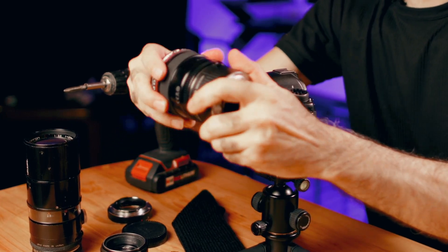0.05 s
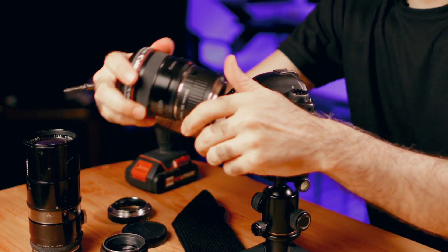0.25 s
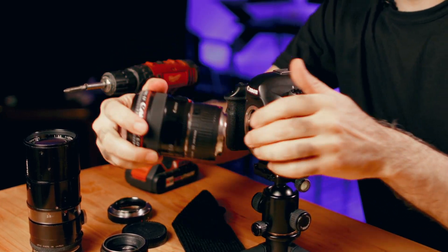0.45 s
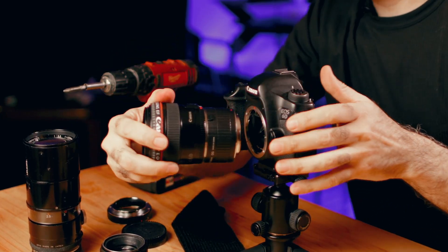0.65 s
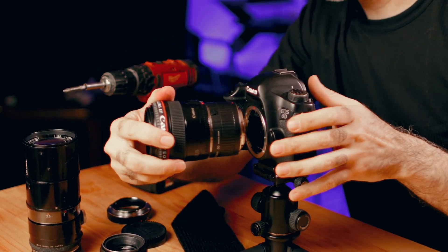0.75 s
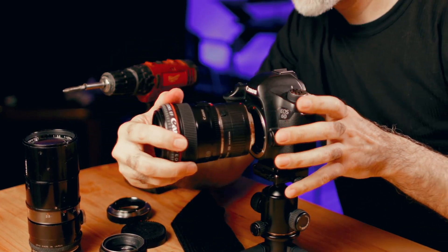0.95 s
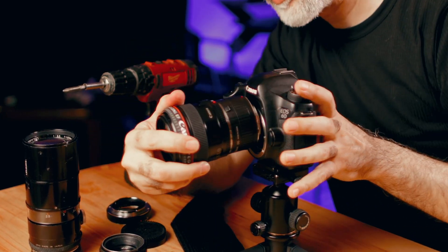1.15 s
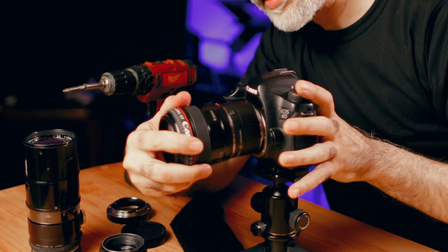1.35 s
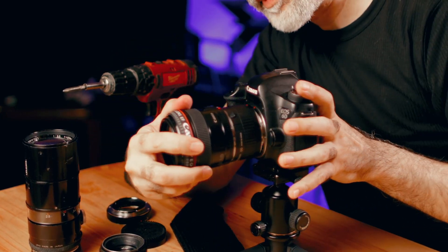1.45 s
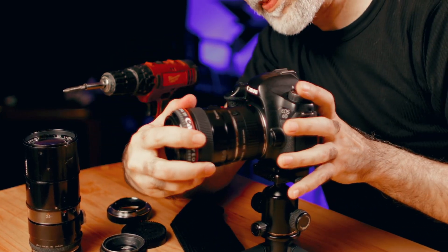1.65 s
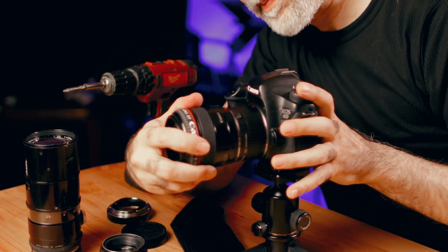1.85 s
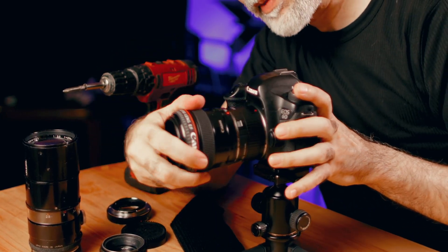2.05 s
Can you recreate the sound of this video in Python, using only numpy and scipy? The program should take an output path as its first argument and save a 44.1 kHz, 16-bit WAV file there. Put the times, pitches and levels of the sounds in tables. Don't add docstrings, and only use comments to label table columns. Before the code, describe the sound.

A camera lens is attached to a camera body, close up in a small quiet room. A very brief slide and sharp metallic snap come at once. Faint finger ticks and soft hollow pops follow from 0.3 to 1.0 s. Metal knocks and scrapes at 1.2 s, light rattles at 1.4, then a dense loud burst of clacks at 1.6-1.7, a small knock at 1.77, and faint ticks around 2.0.

```python
import sys
import numpy as np
from scipy import signal
from scipy.fft import rfft, irfft
from scipy.io import wavfile
from scipy.ndimage import uniform_filter1d

SR = 44100
rng = np.random.default_rng(int(sys.argv[2]) if len(sys.argv) > 2 else 0)


def undo_db(level):
    steps = np.asarray(level, float) / 20
    return 10 ** steps


def transcribe(u):
    v = np.clip(np.atleast_2d(u).T, -1, 1)
    q = np.round(v * 32767).astype(np.int16)
    wavfile.write(sys.argv[1], SR, q)


N = 93006

# [f/Hz, level/dB per Hz]
RUMBLE = [(15, -38.5), (25, -23), (55, 0), (102, -1), (245, -9), (303, -16), (461, -11), (638, -20.5),
          (1200, -29.5), (1560, -58), (2640, -120)]
HISS = [(710, -39.5), (1200, -3.5), (1630, -2.5), (3280, -9.5), (5490, -10.5), (6540, -11), (11100, -2),
        (15500, -11), (16400, -16.5)]
WIDTH = [(15, -33), (25, -8), (101, 1), (501, -10.5), (1630, -26.5), (10000, -13), (15000, -12.5)]
RUMBLE_DB, HISS_DB, WIDTH_DB = -56, -67.5, -73.5

# [f/Hz, level/dB]
ROOM_DECAY = [(150, 0.1), (600, 0.37), (1400, 0.29), (2200, 0.34), (4000, 0.36), (8000, 0.35),
              (14000, 0.35)]
ROOM_COLOUR = [(150, -1), (600, 0), (1400, -1), (2200, -0.5), (3400, -5.5), (8000, -4.5), (14000, 0)]
ROOM_DB, ROOM_GAP_S = -5.5, 0.0013

THUMPS = [
    (1.6048, -31, 305, .035),
    (1.662, -36, 101, .2),
    (1.663, -29, 770, .06),
    (1.665, -37, 163, .25),
    (1.745, -45, 98, .4),
    (1.74, -46, 162, .4),
    (1.965, -51, 200, .08),
]
BARREL_POPS = [
    (.7943, -32, 710, .026),
    (.7945, -35, 800, .03),
    (.7948, -40, 590, .016),
    (.7945, -46, 1350, .012),
    (.9800, -33, 1100, .028),
    (.9805, -44, 540, .014),
    (.9975, -50, 1110, .022),
]
PART_PINGS = [(1.6318, -21, 5835, .011), (1.6318, -28, 830, .045), (1.632, -31, 1696, .03),
              (1.6315, -32, 315, .05), (1.6525, -30, 430, .04), (1.6525, -28, 7800, .007),
              (1.6608, -27, 6500, .009), (1.6615, -31, 10400, .006), (1.662, -29, 1310, .042),
              (1.664, -30, 652, .1), (1.663, -31, 912, .1), (1.655, -29, 320, .05),
              (1.4058, -38, 3000, .018), (1.6055, -27, 4520, .02), (1.6058, -29, 2240, .02),
              (1.6523, -22, 4510, .016), (1.6615, -25, 4000, .008)]
THUMP_DB, POP_ROOM_DB = -0.3, -12

# [t/s, level/dB, centre f/Hz, width/Hz, chatter/s]
FINGER_TICKS = [(0.283, -54.5, 7800, 2520, 0.013), (.3247, -37, 7740, 2200, 0.00094),
                (0.3402, -51, 6480, 2920, .001), (0.6696, -44, 6570, 4930, 0.00088),
                (0.675, -59.5, 2580, 600, 0.009), (.686, -55, 7000, 4070, .002),
                (0.7951, -50.5, 4700, 1200, 0.00058), (0.7949, -42, 1990, 1450, 0.00014),
                (0.9409, -50.5, 1600, 2540, 0.00087), (0.9454, -49.5, 6900, 4990, 0.0014),
                (0.9823, -52, 3370, 3040, 0.0013), (1.9026, -51.5, 3900, 6000, 0.0016),
                (1.963, -57, 8280, 8850, .001), (1.981, -50.5, 3380, 4030, 0.00045),
                (2.0372, -41, 1560, 1470, 0.00043), (2.0994, -37.5, 7660, 4015, 0.0014),
                (2.0985, -46, 12200, 2000, 0.0024), (2.099, -47.5, 3880, 3080, 0.0032)]

# spectrum of its many small modes [f/Hz, level/dB per Hz], its strong modes [f/Hz, level/dB, t60/s]
LATCH = ([(300, -32), (800, -17), (1500, -13), (2400, -6), (3700, -5), (8000, -3.5), (12000, -11),
         (16000, -24.5)], [(894, -9, .02), (2037, 0, 0.018), (3040, 4, .013), (4440, -3, .014),
         (5860, -6.5, .01), (7050, -6, 0.014), (8310, -1, 0.014), (9140, -5, 0.0054)])
LOOSE_MOUNT = ([(120, -41), (200, -2), (2380, -5.5), (2960, -1.5), (4860, -12), (6050, -5.5), (16000, -31)],
               [(353, -1.5, 0.021), (739, -7, 0.034), (988, -6.5, 0.026), (2160, -9, 0.02),
               (2900, 7.5, 0.0042), (6136, -10, 0.0072)])
RESTING_MOUNT = ([(120, -34.5), (200, -7), (696, -2.5), (791, -5), (2960, -2), (16000, -32.5)],
                 [(362, -1.5, 0.03), (436, -4, 0.028), (816, -2, 0.029), (2200, 1, 0.016),
                 (2940, -2.5, 0.019), (5840, -9.5, 0.021), (9800, -6, 0.0067)])
CAUGHT_MOUNT = ([(200, -22), (322, -3.5), (899, -2), (1450, -7.5), (3000, 0.5), (4600, -8.5), (7830, -12),
                (16000, -40.5)], [(320, -9, 0.024), (645, -8, 0.024), (2256, -2.5, .012),
                (2740, -4.5, 0.013), (3310, -6, .015), (4510, -1, 0.013), (6900, -5, 0.0087)])
TIGHT_MOUNT = ([(120, -52), (200, 2.5), (322, 0), (899, -2.5), (1450, -2), (4600, -8.5), (7830, -10.5),
               (16000, -37)], [(420, -13, 0.026), (633, -7.5, 0.0265), (883, -4, 0.019), (2200, 3, 0.0071),
               (4550, -1, 0.01), (5765, -13, 0.0081)])
ROCKED_MOUNT = ([(300, -21), (800, -1.5), (1200, 0), (2400, -8.5), (3300, -9.5), (5100, -9.5), (8000, -19),
                (16000, -39)], [(1174, -2.5, 0.015), (1600, -1, 0.016), (2256, 3.5, 0.012),
                (2550, 0, 0.021), (3310, -7, .015), (5110, -2, 0.01), (6330, -9, .01)])

# [start t/s, length/s, level/dB, tilt/dB per octave]
DRAG_OFF = [
    (-.03, 0.063, -46.5, 0.5),
]
DRAG_LOOSE = [
    (1.205, 0.034, -53.5, -4.5),
    (1.25, 0.071, -50, -1.4),
]
DRAG_RESTING = [
    (1.392, 0.059, -52.5, -0.031),
    (1.435, 0.043, -47.5, -0.37),
    (1.48, 0.047, -62, -0.92),
]
DRAG_CAUGHT = [
    (1.585, 0.034, -48, -2.1),
    (1.607, 0.0266, -36.5, 0.6),
]
DRAG_TIGHT = [
    (1.665, 0.058, -44, -6),
    (1.92, 0.1, -60, -1.5),
]

# [t/s, peak level/dB, tilt/dB per octave, chatter/s]
SNAP = [
    (.0216, -24.5, 17.5, .0003),
    (.0224, -4.5, 1, 0.00017),
]
SEATING = [
    (1.1803, -20.5, 0.79, 0.00056),
    (1.1972, -24.5, 0.74, 0.00024),
    (1.2055, -30, 1.9, 0.0003),
    (1.268, -38.5, -1.1, 0.0023),
    (1.278, -39, 2, 0.00046),
    (1.2872, -28.5, -1.3, 0.00012),
    (1.297, -35, 0.46, 0.00072),
    (1.306, -37, -0.39, 0.00083),
]
SETTLING = [(1.4057, -29.5, 0.45, 0.0018), (1.4085, -37, .5, 0.00086), (1.4118, -34.5, 0.9, 0.001),
            (1.4165, -49, -0.46, 0.0009), (1.4205, -40, .5, .001), (1.4435, -43, 1, .001),
            (1.4547, -39, .5, 0.0014), (1.4635, -38.5, 0.92, 0.001), (1.4665, -42, .5, .001),
            (1.4705, -41, .5, .001), (1.4745, -41, -.6, 0.00085)]
CATCHING = [
    (1.6055, -20, 1.3, 0.00095),
    (1.6135, -24.5, 1.3, 0.00064),
    (1.618, -34, 0.39, 0.00083),
    (1.628, -28.5, 1.8, 0.00087),
    (1.6315, -15.5, 0.59, 0.00091),
    (1.638, -24, -0.85, .001),
]
TWIST = [
    (1.6523, -15, 2.9, 0.00099),
    (1.6548, -16, 1.5, 0.0006),
    (1.6595, -20.5, 1, .0008),
    (1.6615, -15, 1, 0.0011),
    (1.668, -24, 1.4, 0.0015),
    (1.6745, -27.5, -0.5, 0.002),
]
ROCKING = [
    (1.7662, -25.5, -0.13, .001),
    (1.7688, -29, -1, 0.00066),
    (1.7722, -37, 1, 0.00083),
    (1.7755, -41, 1.5, 0.0017),
    (1.7785, -51, -1, 0.0012),
]

SLIPS_PER_S, SLIP_SPREAD_DB = 3000, 3.0
SMALL_RING_S, SMALL_RING_SLOPE = 0.017, -0.24
SMALL_DB, STRONG_ROOM_DB = 28, -6.5
EVEN_HZ = 499
DETUNE = .008
RISE_S = 0.00038
LEAD = 44


def evened(x):
    return x / np.sqrt(np.mean(x ** 2) + 1e-20)


def read(points, hz):
    f, value = np.transpose(points)
    return np.interp(np.log(hz + 1), np.log(f + 1), value)


def add(mix, s, sound):
    at = round(s * SR)
    sound = sound[max(-at, 0):]
    part = mix[max(at, 0):][:len(sound)]
    part += sound[:len(part)]


def noise(spectrum, patchy_db):
    frames, hz = N // 256 + 5, np.fft.rfftfreq(1024, 1 / SR)
    real, imag, patches = rng.standard_normal((frames, 513, 3)).T
    patches = uniform_filter1d(patches, size=10, axis=0)
    patches = evened(uniform_filter1d(patches, size=12, axis=1))
    z = (real + 1j * imag) * undo_db(read(spectrum, hz)[:, None] + patchy_db * patches)
    return evened(signal.istft(z, nperseg=1024, noverlap=768)[1][:N])


def room(x):
    taps = np.zeros(SR // 2)
    at = np.arange(0, SR // 2 - 20, 20)
    taps[at + rng.integers(0, 20, len(at))] = rng.choice([-1., 1.], len(at))
    hz, t, z = signal.stft(taps, SR, nperseg=256)
    level_db = read(ROOM_COLOUR, hz)[:, None] - 60 * t / read(ROOM_DECAY, hz)[:, None]
    tail = signal.istft(z * undo_db(level_db), SR, nperseg=256)[1]
    tail = tail * np.minimum(np.arange(len(tail)) / SR / ROOM_GAP_S, 1) ** 2
    return signal.fftconvolve(x, tail / np.linalg.norm(tail))[:N]


def struck(hz, db, t60, t):
    onset = 1 - np.exp(-(t / RISE_S) ** 2)
    return undo_db(db - 60 * t / t60) * np.sin(2 * np.pi * hz * t) * onset


def pops(rows):
    out = np.zeros(N)
    for s, db, hz, t60 in rows:
        add(out, s, struck(hz, db, t60, np.arange(SR // 3) / SR))
    return out


def chatter(length):
    t = np.arange(1024) / SR
    return rng.standard_normal(len(t)) * np.exp(-t / length)


def ticks():
    out = np.zeros(N)
    for s, db, hz, width_hz, length in FINGER_TICKS:
        b, a = signal.iirpeak(hz, hz / width_hz, SR)
        tick = signal.lfilter(b, a, chatter(length))
        tick = signal.lfilter(b, a, tick)
        add(out, s, undo_db(db) * tick / abs(tick).max())
    return out


def ring(body, tilt_db, touch, count=140):
    colour, strong = body
    t = np.arange(2048)[:, None] / SR
    place, phase = rng.random((count, 2)).T
    hz = 150 + 16000 * ((np.arange(count) + place) / count) ** 1.5
    t60 = SMALL_RING_S * (hz / 2000) ** SMALL_RING_SLOPE
    crowd = (undo_db(-60 * t / t60) * np.sin(2 * np.pi * (hz * t + phase))).sum(axis=1)

    z, f = rfft(signal.fftconvolve(crowd, touch), 4096), np.fft.rfftfreq(4096, 1 / SR)
    even = np.sqrt(uniform_filter1d(abs(z) ** 2, size=round(EVEN_HZ * 4096 / SR)))
    tone = undo_db(SMALL_DB + read(colour, f) + tilt_db * np.log2(f / 2000 + 0.028))
    small = np.roll(irfft(tone * z / [even, abs(z)]), LEAD, axis=1)[:, :2048]
    near, around = small * np.minimum(t.T * SR / LEAD, 1) ** 2

    hz, db, t60 = np.transpose(strong)
    hz = hz * (1 + DETUNE * rng.standard_normal(len(hz)))
    modes = struck(hz, db + tilt_db * np.log2(hz / 2000), t60, t).sum(axis=1)
    modes = np.roll(modes, LEAD)
    return np.array([near + modes, around + undo_db(STRONG_ROOM_DB) * modes])


def drags(rows, body):
    out = np.zeros(N)
    for s, length, db, tilt_db in rows:
        chance, size, sign = rng.random((SR // 5, 3)).T
        stroke = np.sin(np.pi * np.minimum(np.arange(SR // 5) / SR / length, 1))
        sizes = undo_db(-SLIP_SPREAD_DB * np.log(size + 0.0017))
        slips = (chance < SLIPS_PER_S / SR) * sizes * np.sign(sign - .5)
        response = ring(body, tilt_db, np.ones(1))[0]
        response = response / np.linalg.norm(response)
        add(out, s, undo_db(db) * signal.fftconvolve(stroke * evened(slips), response))
    return out


def knocks(rows, body):
    out = np.zeros((N, 2))
    for s, db, tilt_db, length in rows:
        hit = ring(body, tilt_db, chatter(length))
        add(out, s - LEAD / SR, undo_db(db) * hit.T / abs(hit[0]).max())
    return out.T


def scene():
    floor = undo_db(RUMBLE_DB) * noise(RUMBLE, patchy_db=-1.3) + undo_db(HISS_DB) * noise(HISS, patchy_db=1.2)
    side = undo_db(WIDTH_DB) * noise(WIDTH, patchy_db=-2.0)

    pop_sends = undo_db([[0], [POP_ROOM_DB]])
    handling = ticks() + pop_sends * pops(BARREL_POPS)
    unlatching = drags(DRAG_OFF, LATCH) + knocks(SNAP, LATCH)
    seating = drags(DRAG_LOOSE, LOOSE_MOUNT) + knocks(SEATING, LOOSE_MOUNT)
    settling = drags(DRAG_RESTING, RESTING_MOUNT) + knocks(SETTLING, RESTING_MOUNT)
    catching = drags(DRAG_CAUGHT, CAUGHT_MOUNT) + knocks(CATCHING, CAUGHT_MOUNT)
    twisting = drags(DRAG_TIGHT, TIGHT_MOUNT) + knocks(TWIST, TIGHT_MOUNT)
    twisting = twisting + knocks(ROCKING, ROCKED_MOUNT) + pop_sends * pops(PART_PINGS)

    stages = [handling + unlatching, seating + settling, catching + twisting]
    near = sum(stage[0] for stage in stages)
    echoes = undo_db(ROOM_DB) * sum(room(stage[1]) for stage in stages)
    mid = near + echoes + undo_db(THUMP_DB) * pops(THUMPS) + floor
    return np.array([mid + side, mid - side])


def band_limit(x):
    return signal.sosfilt(signal.butter(12, 16400, fs=SR, output="sos"), x)


def record(dry):
    low_edge_hz, high_edge_hz = 69.4, 16250
    low_cut = signal.butter(4, low_edge_hz, "highpass", fs=SR, output="sos")
    high_cut = signal.firwin(255, high_edge_hz, fs=SR)[None]
    mix = signal.sosfilt(low_cut, dry)
    mix = signal.oaconvolve(mix, high_cut, "same", axes=1)
    return band_limit(mix)


dry = scene()
out = record(dry)
transcribe(out)
```